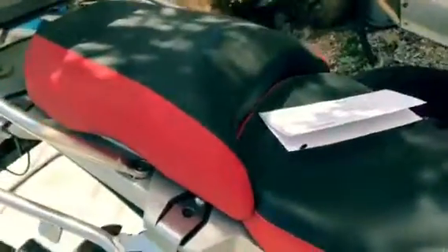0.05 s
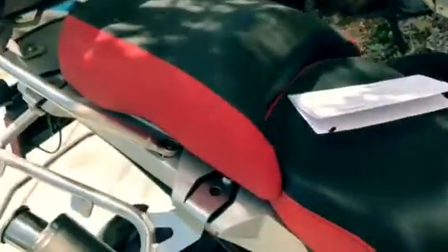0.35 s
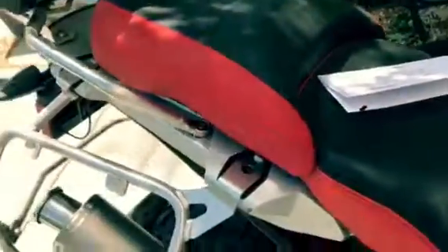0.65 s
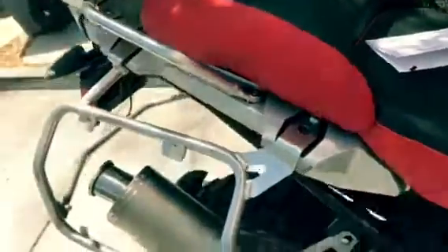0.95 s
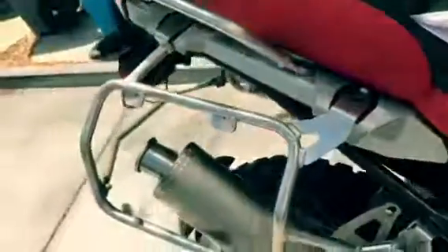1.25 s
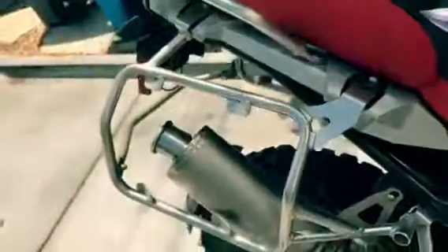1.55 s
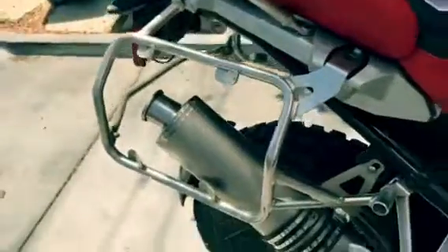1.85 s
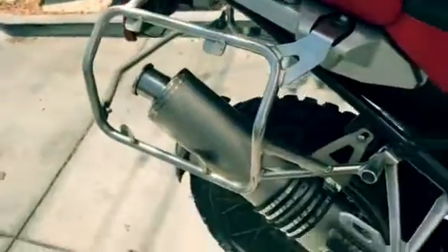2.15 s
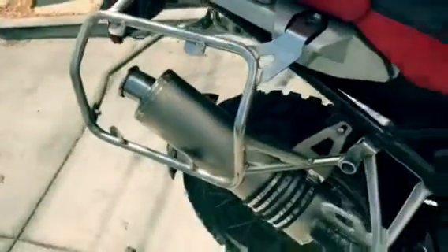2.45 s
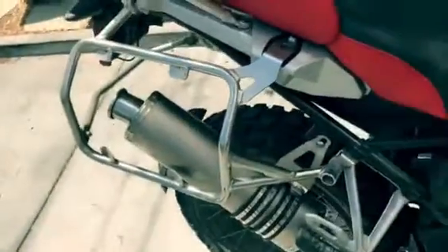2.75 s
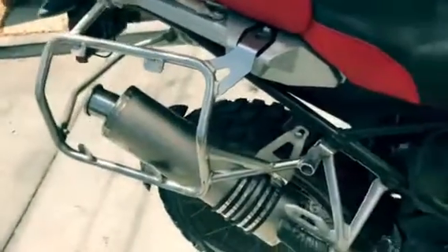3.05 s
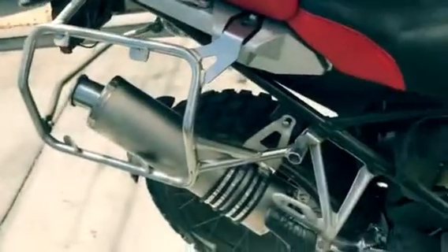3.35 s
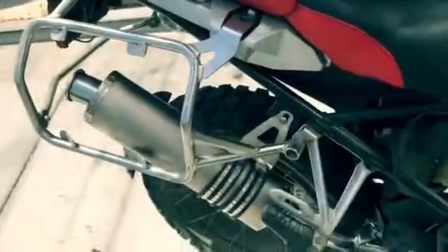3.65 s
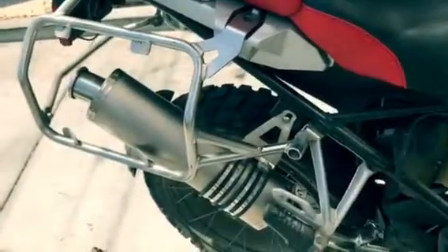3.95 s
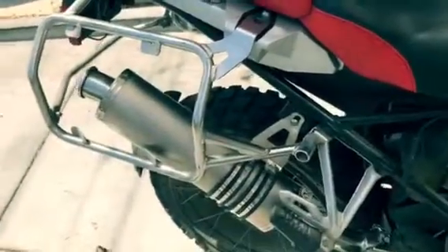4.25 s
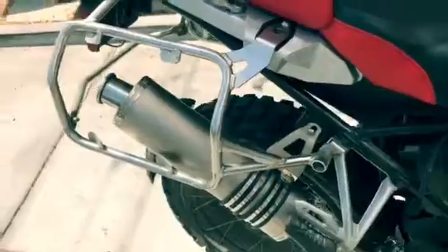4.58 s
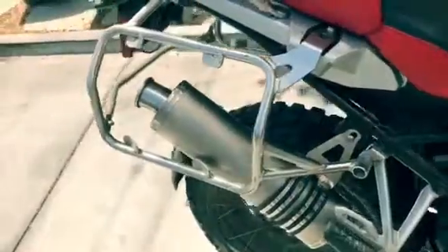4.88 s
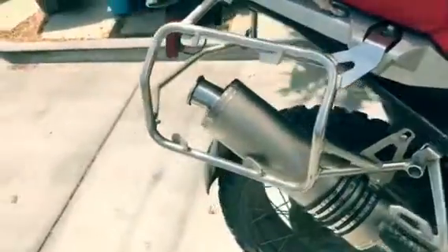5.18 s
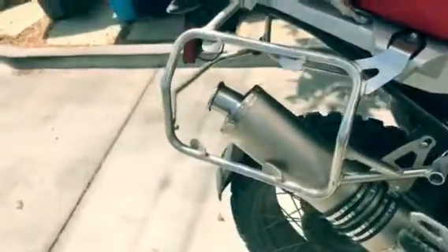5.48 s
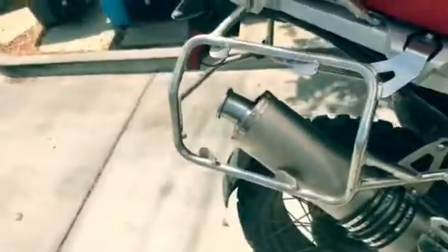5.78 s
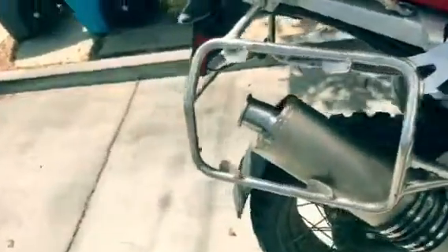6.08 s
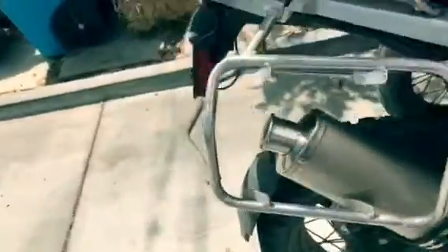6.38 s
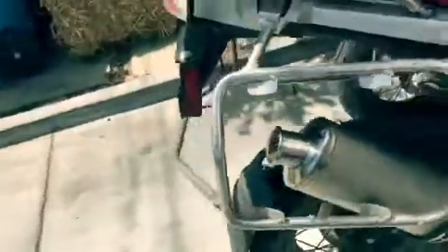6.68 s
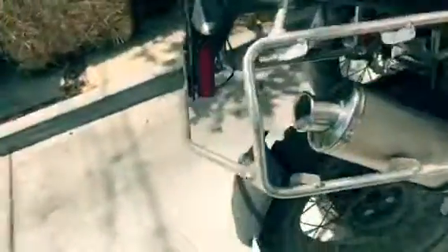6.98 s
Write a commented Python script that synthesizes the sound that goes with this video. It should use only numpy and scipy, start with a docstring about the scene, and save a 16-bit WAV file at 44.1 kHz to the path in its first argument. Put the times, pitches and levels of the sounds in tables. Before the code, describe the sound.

Outdoors, over a faint rumble of distant traffic, come quiet key clicks, soft rubbing and the thin whine and whir of a motorcycle's electrics. A sharp click sets off a short grinding crank, and the engine fires. It runs fast for a moment, then eases into a loud, thumping idle with ticking valves, growing slightly louder as the microphone nears the open exhaust.

```python
"""A concrete driveway, the microphone beside the open silencer of a single-cylinder motorcycle, traffic
far off. The key clicks in, hands rub on the bike, the electrics whine and a servo whirs to its stop.
The starter's gears grind over two compressions and the engine catches with a few bangs, each a pressure
pulse that rings the pipe and a puff of gas. It sinks to a thumping idle over the clatter of its valve
gear as the microphone moves in closer."""
import sys
import numpy as np
from scipy import signal
from scipy.fft import rfft, irfft, next_fast_len
from scipy.io import wavfile

SR = 44100
rng = np.random.default_rng(int(sys.argv[2]) if len(sys.argv) > 2 else 0)


def dump_mix(stems):
    """Bounce the given channels to the path in sys.argv[1] as a 16-bit WAV at rate SR."""
    frames = np.atleast_2d(stems).T  # one column per channel
    limited = np.clip(frames, -1, 1)  # hard clip at full scale
    pcm = np.round(limited * 32767).astype(np.int16)
    wavfile.write(sys.argv[1], SR, pcm)


N = 314433
TIME = np.arange(N) / SR

# Distant traffic. Each row: frequency in Hz, level in dB.
TRAFFIC_COLOUR = [(15, -50), (25, -22.5), (87, -3.5), (114, -13.5), (256, -18), (326, -15.5), (373, -19.5),
                  (439, -26.5), (476, -27.5), (516, -25.5), (1260, -27), (2350, -40.5), (3250, -39.5),
                  (4870, -44.5), (16000, -56.5)]
# Key, switches and relays. Each row: start in seconds, level in dB, centre in Hz, t60 in seconds.
CLICKS = [(0.06, -38, 12000, 0.018), (.251, -50, 9000, 0.033), (.280, -41, 11000, 0.021),
          (.297, -41, 9700, 0.036), (.845, -32.5, 5000, 0.022), (.847, -36, 646, .05),
          (.899, -35, 3370, 0.06), (.960, -47, 11000, .05), (0.978, -43.5, 6000, 0.046),
          (.995, -45.5, 10000, 0.11), (1.095, -45, 4000, .05), (1.154, -35.5, 3050, 0.085),
          (1.232, -32, 4560, 0.023), (1.391, -43, 3000, 0.05), (1.430, -28.5, 5400, 0.01),
          (1.435, -28.5, 4300, 0.021), (1.481, -36.5, 1800, 0.072), (1.484, -32.5, 402, 0.024),
          (1.757, -33.5, 2350, 0.083), (2.3023, -21.5, 4930, 0.027), (2.303, -33, 1310, 0.054),
          (3.449, -45, 2160, 0.048), (3.569, -19.5, 5200, 0.064), (3.571, -18.5, 1570, 0.11),
          (4.2377, -26.5, 5950, 0.076), (4.3541, -22.5, 5010, 0.025), (4.413, -25.5, 5000, 0.038)]
# Strokes of the hand on the bike. Each row: start and length in seconds, level in dB.
RUBS = [(.38, 0.3, -58), (.88, 0.49, -50), (1.44, 0.076, -43), (1.66, 0.2, -60)]
# The rubbing. Each row: frequency in Hz, level in dB.
RUB_COLOUR = [(120, -11), (300, 9), (550, -7), (820, 2), (1300, -0.5), (2500, -12), (3500, -4), (4500, -16),
              (12000, -45)]
# The key sliding in the lock. Each row: start and length in seconds, level in dB.
KEY_SLIDES = [(.74, .12, -60), (.93, .4, -59.5)]
# Small sliding metal parts, key and servo. Each row: frequency in Hz, level in dB.
SLIDING_COLOUR = [(350, -59), (600, -16), (1030, 1), (1780, -10), (1930, -9), (2680, -3), (2950, -8.5),
                  (9360, -8), (16000, -12.5)]
# Hiss of the live electrics. Each row: frequency in Hz, level in dB.
ELECTRICS_COLOUR = [(700, -2), (1200, -5), (2050, -2.5), (2500, -6), (2950, -3.5), (3510, -13.5),
                    (4500, -5), (6700, -4.5), (8000, -16), (9700, -16.5), (10600, -26), (13600, -17),
                    (16000, -36)]
# Their whines. Each row: start and end in seconds, pitch in Hz, level in dB.
WHINES = [(1.38, 3.46, 1001, -58.5), (1.3, 2.6, 4479, -64.5), (1.75, 2.3, 6298, -66.5),
          (1.75, 2.3, 6918, -72), (2.68, 3.42, 4420, -68), (2.68, 3.42, 5570, -70)]
# The servo running out and back. Each row: start and end in seconds, level in dB.
SERVO_RUNS = [(1.42, 1.78, -47.5), (2.293, 2.654, -47.8)]
# The servo hitting its stop. Each row: start in seconds, level in dB.
STOP_HITS = [(2.501, -32.5), (2.582, -42)]
# Ring of that stop. Each row: frequency and width in Hz, level in dB.
STOP_MODES = [(980, 920, -11.5), (1980, 160, -1), (2288, 42, 6), (2920, 420, -3), (5300, 1300, -10.5),
              (7000, 250, -3.5), (8700, 340, -5), (13200, 1300, -12)]
# Surges of the starter. Each row: start and run-up in seconds, top gear mesh in Hz, slowing time in
# seconds, gain in dB at a mesh of 1 kHz.
STARTER_SURGES = [(3.562, 0.11, 993, .054, -13), (3.823, .007, 1433, 0.053, -13),
                  (3.982, .007, 1461, .047, -14.5), (4.05, 0.039, 685, 0.13, -17)]
# The starter gears. Each row: frequency in Hz, level in dB.
STARTER_COLOUR = [(100, -23), (300, -10), (500, -16), (800, -12), (1100, -9), (1380, 0.5), (1930, -8),
                  (2480, -7), (2900, -9.5), (3950, -8), (5900, -10.5), (7200, -19), (9700, -13.5),
                  (11500, -30), (16000, -28)]
# Ring of the engine covers. Each row: frequency and width in Hz, level in dB.
COVER_MODES = [(1410, 87, -9), (2310, 14, -6), (2904, 80, 8), (3200, 160, -8.5), (4700, 61, -38)]
# Unfired exhaust strokes. Each row: start in seconds, pulse level in dB, pulse rise in seconds.
CHUFFS = [(3.772, 3, .0025), (3.931, 3, .0025)]
# Ring of the pipe with the valve shut again. Each row: frequency and width in Hz, level in dB.
SHUT_PIPE_MODES = [(86, 9.3, 54.5), (177, 26, 44)]
# First firings. Each row: start in seconds, pulse level in dB, pulse rise in seconds, gas puff in dB.
FIRST_FIRINGS = [(4.065, 3, 0.00091, -7), (4.1145, 1.5, 0.00054, -7), (4.1558, -1.5, 0.00065, -13),
                 (4.1914, -6.5, 0.00051, -24.5)]
# Standing waves of the exhaust. Each row: frequency and width in Hz, level in dB.
PIPE_MODES = [(45.6, 18, 36), (83.6, 25.3, 45.5), (176.5, 11.8, 46.5), (190, 6.3, 3), (267.3, 130, 48.5),
              (350, 29, 41), (552, 93, 38)]
# The gas puffs. Each row: frequency in Hz, level in dB.
GAS_COLOUR = [(100, 2), (300, 4), (520, 4.5), (750, 1), (1300, -4.5), (2500, -14), (5000, -18),
              (10000, -23), (16000, -21)]
# High pipe overtones, rung by the gas. Each row: frequency and width in Hz, level in dB.
PIPE_OVERTONES = [(801, 15, 8), (881, 20, 12.5), (1132, 26, 13), (1250, 28, 7.5), (1567, 53, 9.5)]
# Engine speed, a flare that sinks to idle. Each row: time in seconds, firings per second.
FIRING_RATE = [(4.222, 35.23), (4.735, 29.07), (5.46, 24.37), (5.804, 22.91), (6.716, 20.83),
               (6.881, 22.44), (7.13, 20.38)]
# The hardest burns popping at the outlet. Each row: start in seconds, gas puff in dB.
POPS = [(4.685, -28), (4.89, -26.5), (5.113, -30), (5.261, -24.5), (5.717, -39), (6.996, -35)]
# Valve gear and timing chain. Each row: frequency in Hz, level in dB.
CLATTER_COLOUR = [(400, -2), (750, -7), (1090, -10), (1500, -3.5), (2100, -7.5), (3200, -3), (3600, -7.5),
                  (4670, -8), (5700, -10), (7500, -17.5), (9600, -19.5), (10500, -24.5), (14600, -21.5),
                  (16000, -27)]

RUNNING_S, IDLE_HZ = 4.2224, 22  # regular firing begins; firing rate at idle


def undb(db):
    """Decibels to gain."""
    return 10 ** (np.asarray(db) / 20)


def unit(x):
    """Scale to rms 1."""
    return x / np.sqrt(np.mean(x ** 2))


def curve(rows, at=TIME):
    """Rows of time and value joined by straight lines."""
    return np.interp(at, *np.transpose(rows))


def decay(age, t60):
    """Exponential fall, 60 dB in t60 seconds."""
    return np.exp(-np.log(1000) * age / t60)


def ramp(start, length, at=TIME):
    """A straight rise from 0 to 1."""
    return np.clip((at - start) / length, 0, 1)


def gate(start, end, attack, release):
    """Attack, hold, release."""
    return ramp(start, attack) * (1 - ramp(end - release, release))


def add(track, start, sound):
    """Mix a sound in at a time in seconds."""
    i = int(start * SR)
    track[i:i + len(sound)] += sound[:max(N - i, 0)]


def filtered(x, response):
    """Apply a frequency response."""
    size = next_fast_len(len(x) + SR // 4)
    hz = np.fft.rfftfreq(size, 1 / SR) + 1e-6
    return irfft(rfft(x, size) * response(hz), size)[:len(x)]


def colour(x, points):
    """Shape a sound's spectrum, keeping the power of white noise."""
    hz, db = np.transpose(points)
    return filtered(x, lambda f: unit(undb(np.interp(np.log(f), np.log(hz), db))))


def resonate(x, modes):
    """Damped resonances; neighbouring modes swing in opposite directions."""
    return filtered(x, lambda f: sum((-1) ** (k + 1) * undb(db) / (1 + 1j * (f * f - hz * hz) / (bw * f))
                                     for k, (hz, bw, db) in enumerate(modes)))


def walk(rate):
    """Random drift, `rate` steps a second, spread near 1."""
    steps = rng.standard_normal(4096)
    return 1.2 * np.interp(TIME * rate, np.arange(len(steps)), steps)


def grains(rate, spread_db):
    """Dense tiny impacts of uneven size, rms 1."""
    hit = rng.random(N) < rate / SR
    return unit(hit * rng.standard_normal(N) * undb(spread_db * np.minimum(rng.exponential(size=N), 4)))


def casing(x, t60, direct_db):
    """Cast metal: countless close modes smear every impact into a short ring."""
    age = TIME[:SR // 4]
    ring = rng.standard_normal(len(age)) * decay(age, t60)
    ring /= np.linalg.norm(ring)
    ring[0] += undb(direct_db)
    return signal.fftconvolve(x, ring / np.linalg.norm(ring))[:len(x)]


def traffic(level_db=-47.5):
    """Low rumble from a distant street."""
    return colour(rng.standard_normal(N), TRAFFIC_COLOUR) * undb(level_db + 0.89 * walk(8.7))


def clicks(relative_width=1.22, tail_db=-25, tail_t60=0.55):
    """Small metal contacts: a short ringing crack and a faint rattle after it."""
    out, age = np.zeros(N), TIME[:SR // 4]
    for start, db, hz, t60 in CLICKS:
        band = [(hz, relative_width * hz, 0)]
        ring = unit(resonate(resonate(rng.standard_normal(len(age)), band), band))
        add(out, start, undb(db) * ring * (decay(age, t60) + undb(tail_db) * decay(age, tail_t60)))
    return casing(out, t60=0.046, direct_db=6)


def strokes(rows, peak=0.42):
    """Gain of strokes that swell for the share `peak` of their length, then fade."""
    return sum(undb(db) * np.sqrt(gate(start, start + length, peak * length, (1 - peak) * length))
               for start, length, db in rows)


def handling():
    """Hands and clothes rub softly on the bike while the key slides in its lock."""
    hands = colour(grains(5000, 1.2) * undb(2.5 * walk(35)), RUB_COLOUR)
    key = colour(grains(9800, 1.0), SLIDING_COLOUR)
    return hands * strokes(RUBS) + key * strokes(KEY_SLIDES)


def electrics(hiss_db=-55.5, waver=0.002):
    """While the ignition primes, small motors hiss and whine in their housings."""
    hiss = colour(casing(rng.standard_normal(N), t60=0.17, direct_db=-13), ELECTRICS_COLOUR)
    out = hiss * undb(hiss_db) * gate(start=1.2, end=3.46, attack=0.18, release=0.066)
    for start, end, hz, db in WHINES:
        gain = undb(db + 0.99 * walk(40.1)) * gate(start, end, 0.018, 0.027)
        cycles = np.cumsum(hz * (1 + waver * walk(120))) / SR
        out += gain * np.sqrt(2) * np.sin(2 * np.pi * cycles)
    return out


def servo(ramp_s=0.025, chatter_t60=0.4, chatter_end_s=2.705, release_s=0.012):
    """A servo's sliding parts whir out and back; it hits its stop and chatters."""
    running = sum(undb(db) * gate(start, end, ramp_s, ramp_s) for start, end, db in SERVO_RUNS)
    whir = colour(grains(9800, 0.91), SLIDING_COLOUR)
    shaking = sum(undb(db) * gate(start, chatter_end_s, ramp_s, release_s)
                  * decay(np.maximum(TIME - start - ramp_s, 0), chatter_t60) for start, db in STOP_HITS)
    chatter = unit(resonate(casing(grains(2800, 1.6), t60=0.1, direct_db=-12), STOP_MODES))
    return whir * running + chatter * shaking


def starter_drive(slowest_hz=384.3, drag_shape=1.3, db_per_octave=12.5):
    """Gear mesh in Hz and gain: the starter races until the next compression drags it down."""
    surges = np.array([(top_hz - slowest_hz) * np.sin(np.pi / 2 * ramp(start, run_up))
                       * np.exp(-(np.maximum(TIME - start - run_up, 0) / slowing) ** drag_shape)
                       for start, run_up, top_hz, slowing, _ in STARTER_SURGES])
    hz = slowest_hz + surges.max(axis=0)
    db = np.array(STARTER_SURGES)[surges.argmax(axis=0), -1] + db_per_octave * np.log2(hz / 1000)
    return hz, undb(db) * gate(start=3.568, end=4.26, attack=0.0033, release=0.069)


def starter(flutter_db=3.5, slow_rattle_db=11, whine_db=-9):
    """Meshing gears sing gliding partials that flutter with the backlash, and rattle most when slow."""
    hz, gain = starter_drive()
    teeth = np.cumsum(hz * (1 + 0.026 * walk(400))) / SR
    speed = hz / hz.max()
    mesh = unit(sum(undb(flutter_db * walk(150)) * np.cos(2 * np.pi * k * teeth + .9 * walk(200) + k * k)
                    for k in range(1, 10)))
    rattle = undb(-2) * casing(grains(8000, 1.2), t60=0.04, direct_db=0)
    gears = colour(speed * mesh + undb(slow_rattle_db * (1 - speed)) * rattle, STARTER_COLOUR)
    gears = unit(gears + resonate(gears, COVER_MODES))
    whine = speed ** 3 * np.sin(2 * np.pi * teeth) * undb(flutter_db * walk(270))
    return (gears + undb(whine_db) * whine) * gain


def blowdown(rise_s):
    """Pressure pulse of the opening exhaust valve, area 1."""
    age = TIME[:SR // 20] / rise_s
    pulse = age ** 2 * np.exp(-age)
    return pulse / pulse.sum()


def chuffs():
    """Before the engine fires, each exhaust stroke rings the pipe with a soft, hollow chuff."""
    pressure = np.zeros(N)
    for start, db, rise_s in CHUFFS:
        add(pressure, start, undb(db) * blowdown(rise_s))
    return resonate(pressure, SHUT_PIPE_MODES)


def firing_times():
    """One firing for each cycle of the running engine."""
    cycles = np.cumsum(curve(FIRING_RATE) * (TIME >= RUNNING_S)) / SR
    return np.r_[RUNNING_S, np.interp(np.arange(1, cycles[-1]), cycles, TIME)]


def engine_db(idle_db, per_octave_db, closer_db, at=TIME):
    """Level follows engine speed and gains closer_db as the microphone moves in on the silencer."""
    octaves = np.log2(curve(FIRING_RATE, at) / IDLE_HZ)
    return idle_db + per_octave_db * octaves + closer_db * ramp(start=5.75, length=0.72, at=at)


def exhaust(times, first_rise_s=0.00051, last_rise_s=0.00088, puff_s=0.0036):
    """Each firing rings the pipe and puffs turbulent gas; harder burns are sharper and hiss more."""
    burn, size = rng.standard_normal((len(times), 2)).T
    rises = np.interp(times, [times[0], times[-1]], [first_rise_s, last_rise_s]) * np.exp(-0.074 * burn)
    # Faster firings are smaller, but hiss more.
    pulse_db = engine_db(idle_db=-2.5, per_octave_db=-8, closer_db=3, at=times) + 0.5 * size
    puff_db = engine_db(idle_db=-38, per_octave_db=11, closer_db=3, at=times) + 1.7 * burn
    pressure, flow = np.zeros(N), np.zeros(N)
    age = TIME[:SR // 15] / puff_s
    puff, tail = age * np.exp(1 - age), 0.19 * np.exp(-age / 6)
    for start, db, rise_s, gas_db in [*FIRST_FIRINGS, *zip(times, pulse_db, rises, puff_db)]:
        add(pressure, start, undb(db) * blowdown(rise_s))
        add(flow, start, undb(gas_db) * (puff + tail))
    for start, gas_db in POPS:
        add(flow, start, undb(gas_db) * puff)
    gas = colour(flow * rng.standard_normal(N), GAS_COLOUR)
    overtones = resonate(flow * rng.standard_normal(N), PIPE_OVERTONES)
    return resonate(pressure, PIPE_MODES) + gas + overtones


def valve_gear(times, open_db=-35, close_db=-41, close_phase=0.54, tick_s=0.0039, swell=0.013):
    """The chain rattles and rings the covers, a touch harder at each firing; valves tick twice a cycle."""
    cycles = np.interp(TIME, times, np.arange(len(times)))
    chain = colour(casing(grains(6000, 0.27), t60=0.041, direct_db=2.5), CLATTER_COLOUR)
    chain = unit(chain + resonate(chain, COVER_MODES)) * (1 + swell * np.cos(2 * np.pi * cycles))
    chain *= undb(engine_db(idle_db=-34.5, per_octave_db=5.5, closer_db=1.8))
    chain *= ramp(start=4.04, length=0.3) ** 2  # builds as the engine catches
    taps, age = np.zeros(N), TIME[:SR // 30] / tick_s
    tap = age * np.exp(1 - age)
    for start, period in zip(times, 1 / curve(FIRING_RATE, times)):
        add(taps, start - 0.0015, undb(rng.normal(open_db, 1.04)) * tap)
        add(taps, start + close_phase * period, undb(rng.normal(close_db, 1.8)) * tap)
    ticks = colour(taps * grains(9000, 1.0), [(500, -15), (2000, 3), (4500, -3.5), (8000, -7),
                                              (11000, -12.5), (14500, -8.5), (17000, -35)])
    return chain + ticks


def yard(x, echo_db=-24, t60=0.66, delay_s=0.008):
    """Faint scattered echoes from walls and ground reach the microphone after the direct sound."""
    age = TIME[:SR // 2]
    tail = colour(rng.standard_normal(len(age)), [(150, 0), (600, -1.5), (4000, -11), (15000, -33)])
    tail *= decay(age, t60) * (age > delay_s)
    return x + undb(echo_db) * signal.fftconvolve(x, tail / np.linalg.norm(tail))[:N]


def scene():
    """The motorcycle close by in its yard, the traffic beyond, in mono."""
    times = firing_times()
    engine = exhaust(times) + valve_gear(times) + starter() + chuffs()
    bike = engine + clicks() + handling() + servo() + electrics()
    return (yard(bike) + traffic())[None]


def record(dry, top_hz=15800):
    """The microphone rounds the loudest peaks and cuts the top."""
    rounded = dry / (1 + dry ** 8) ** (1 / 8)
    return signal.sosfilt(signal.ellip(10, 0.2, 80, top_hz, fs=SR, output="sos"), rounded)


dry = scene()
out = record(dry)
dump_mix(out)
```